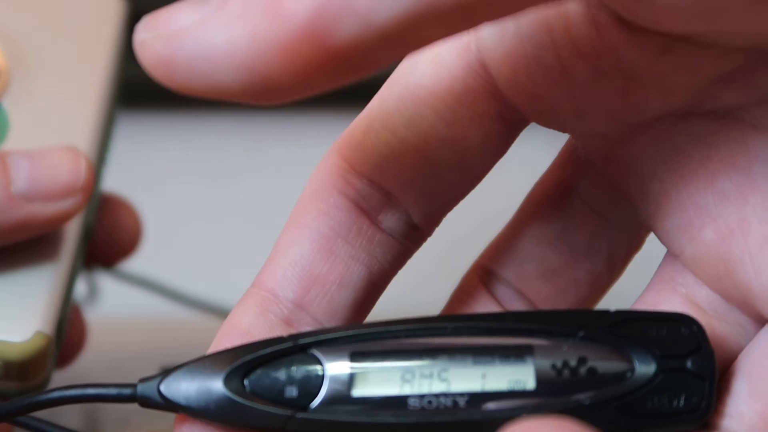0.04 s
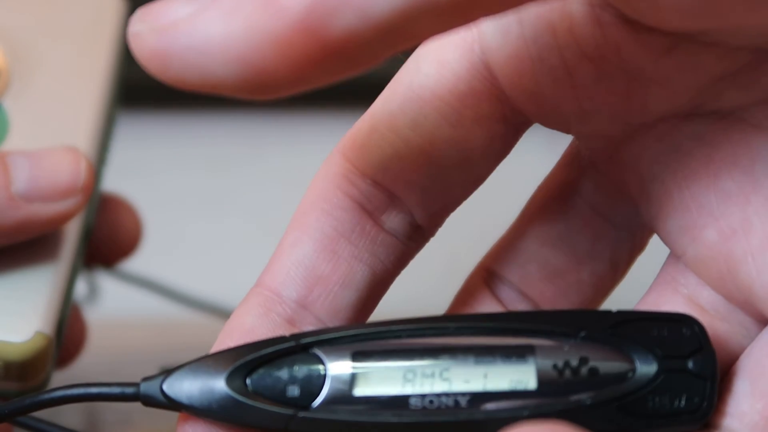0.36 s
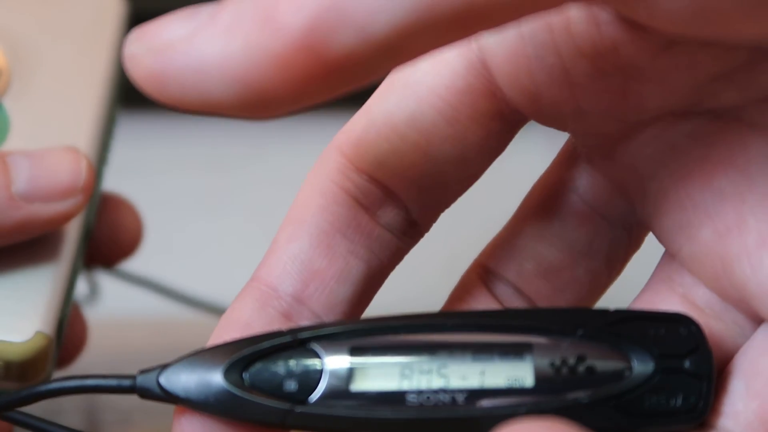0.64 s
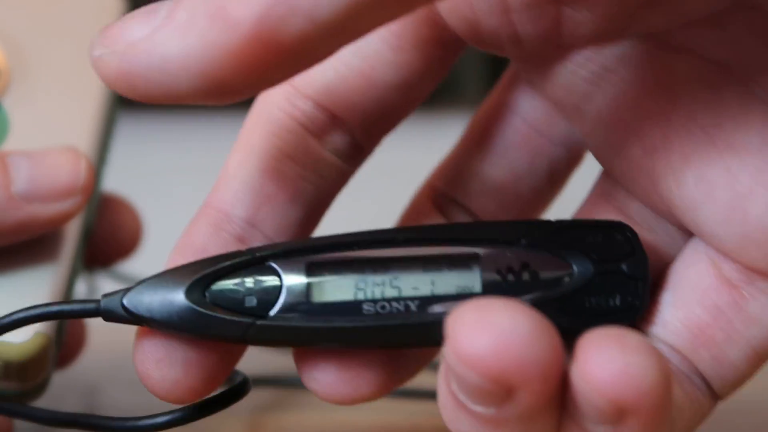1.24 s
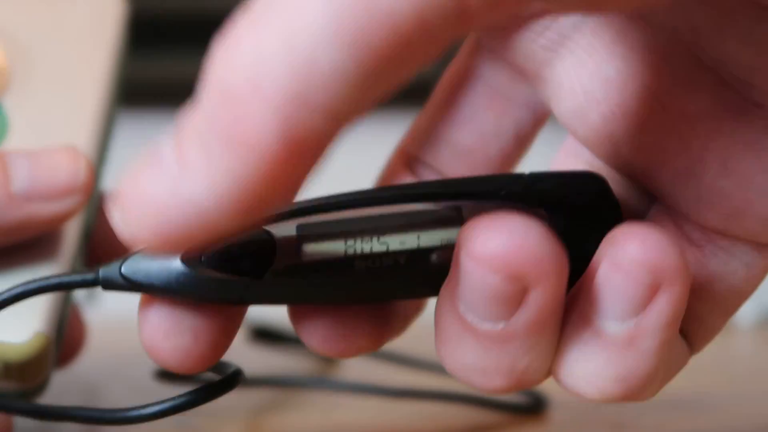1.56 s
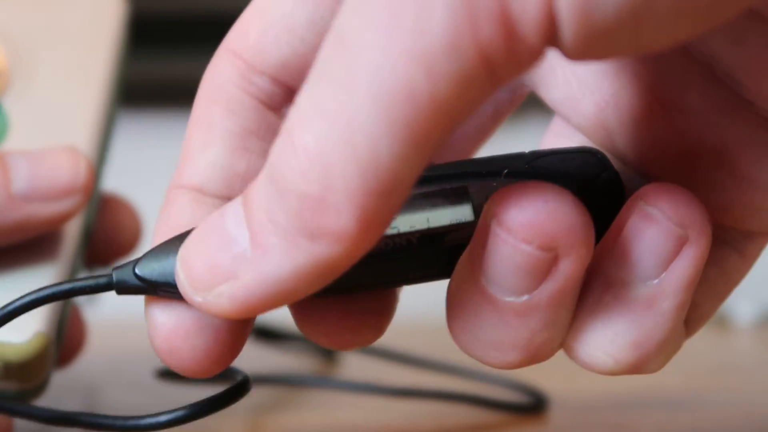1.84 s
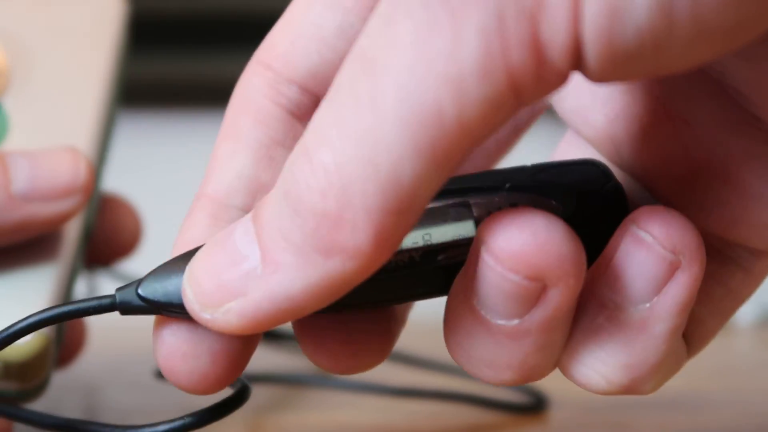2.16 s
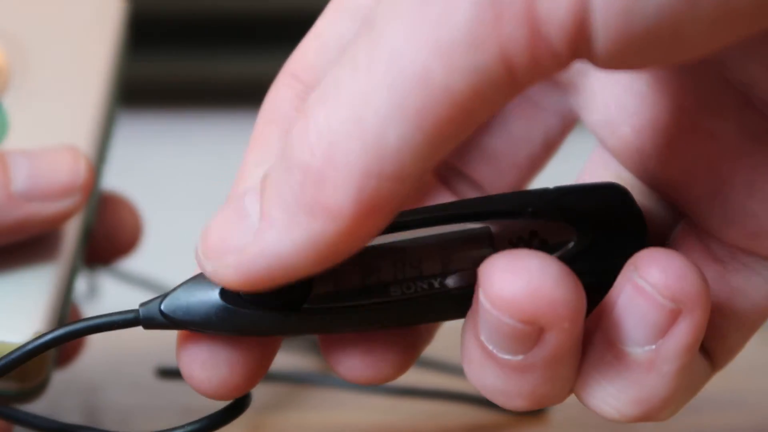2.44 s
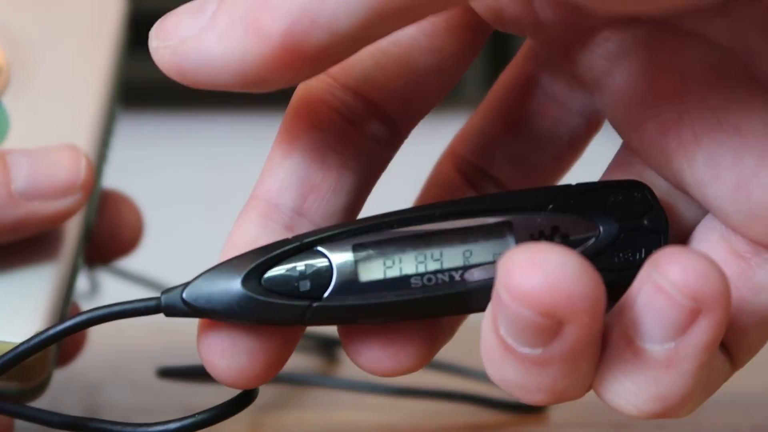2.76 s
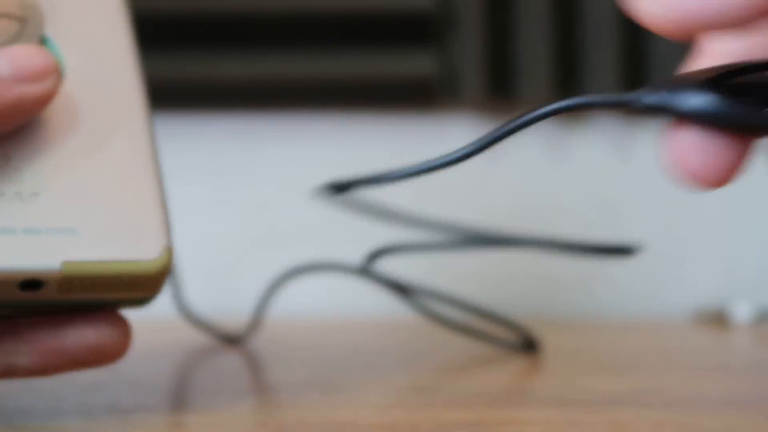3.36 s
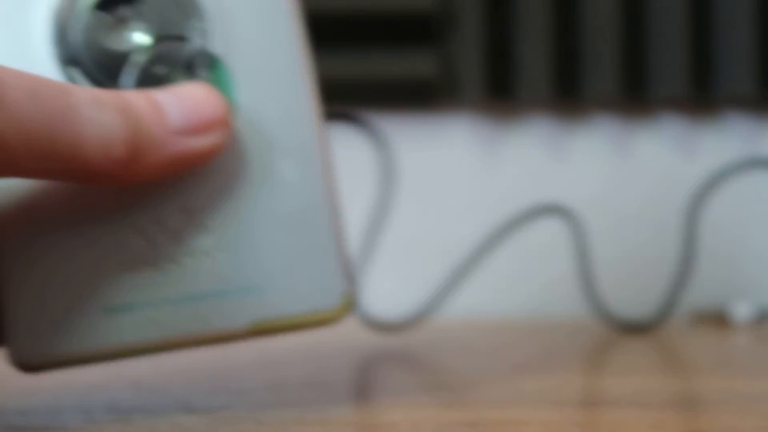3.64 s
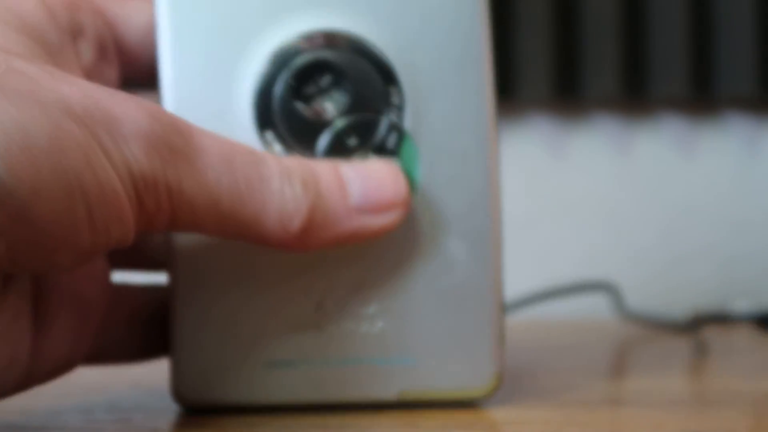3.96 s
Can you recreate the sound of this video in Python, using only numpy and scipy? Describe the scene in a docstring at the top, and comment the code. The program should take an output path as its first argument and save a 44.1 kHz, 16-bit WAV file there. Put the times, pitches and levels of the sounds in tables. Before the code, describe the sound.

A pocket cassette player winds tape close by, its gears whirring, rattling and knocking. A remote button clicks, the drive falters, runs on and stops. Soft hand thuds and a sharp key snap follow in a small, faintly humming room.

```python
"""A small room with a low hum and a faint whine; close by, a pocket cassette player winds tape.
Gear teeth rattle its case, catches tick and a wheel knocks once a turn. The remote's button clicks;
the drive falters, runs on with slower knocks and stops. A hand shifts its grip with hollow thuds
and a scrape of skin, and a key on the player snaps down and latches."""
import sys
import numpy as np
from scipy import signal
from scipy.fft import rfft, irfft
from scipy.io import wavfile

SR = 44100
rng = np.random.default_rng(int(sys.argv[2]) if len(sys.argv) > 2 else 0)


def dump_mix(stems):
    """Bounce the given channels to the path in sys.argv[1] as a 16-bit WAV at rate SR."""
    frames = np.atleast_2d(stems).T  # one column per channel
    limited = np.clip(frames, -1, 1)  # hard clip at full scale
    pcm = np.round(limited * 32767).astype(np.int16)
    wavfile.write(sys.argv[1], SR, pcm)


N = 176400
T, HZ = np.arange(N) / SR, np.maximum(np.arange(N + 1) * SR / (2 * N), 1)


def amp(db):
    """Decibels to gain."""
    return 10 ** (np.asarray(db) / 20)


def unit(x):
    """Scale to rms 1."""
    return x / np.sqrt(np.mean(x ** 2) + 1e-20)


def at_hz(points):
    """Spectrum in dB, interpolated over log frequency."""
    hz, db = np.transpose(points)
    return np.interp(np.log(HZ), np.log(hz), db)


def through(x, response):
    """Apply a frequency response."""
    return irfft(rfft(x, 2 * N) * response)[..., :N]


def lowpass(x, hz):
    """Second-order treble roll-off."""
    return signal.sosfilt(signal.butter(2, hz, fs=SR, output="sos"), x + 1e-18)


def body(x, colour, modes=()):
    """Minimum-phase filter of unit power: broad colour plus resonances."""
    db = at_hz(colour) + sum(lift / (1 + (2 * (HZ - hz) / width) ** 2) for hz, width, lift in modes)
    cepstrum = irfft(np.log(unit(amp(db))))
    cepstrum[1:N] *= 2
    cepstrum[N + 1:] = 0
    return through(x, np.exp(rfft(cepstrum)))


def drift(hz):
    """Random wander of rms 1, mostly below hz."""
    return unit(through(rng.standard_normal(N), 1 / (1 + (HZ / hz) ** 2)))


def burst(s, t60):
    """Decaying contact chatter of unit energy."""
    count = SR // 2
    chatter = rng.choice([-1, 1], count) * amp(-60 * np.arange(count) / SR / t60)
    out, start = np.zeros(N + SR), int(s * SR)
    out[start:start + count] = chatter / np.linalg.norm(chatter)
    return out[:N]


def burst_pair(s, t60):
    """Two independent bursts."""
    return np.array([burst(s, t60), burst(s, t60)])


def strike(s, t60, snap_db):
    """Mid: clean impact plus chatter. Side: chatter only."""
    impact = np.arange(N) == int(s * SR)
    mid = (amp(snap_db) * impact + burst(s, t60)) / np.hypot(1, amp(snap_db))
    return np.array([mid, burst(s, t60)])


def stereo(mid, side, width, pan_db=0):
    """Mid and side to left and right; width is the side/mid spectrum."""
    ratio = amp(at_hz(width))
    mid = through(mid, 1 / np.hypot(1, ratio))
    side = through(side, ratio / np.hypot(1, ratio))
    return np.array([(mid + side) * amp(pan_db / 2), (mid - side) * amp(-pan_db / 2)])


# room noise spectrum: f/Hz, level/dB
AIR_COLOUR = [(15, -36), (25, -10), (38, -6.5), (55, -8.5), (146, -2.5), (213, -3), (250, -9), (400, -10),
              (573, -15), (800, -17), (1500, -18.5), (3200, -25), (7000, -33), (12500, -41), (15000, -65)]
# hums: f/Hz, level/dB, width/Hz
HUMS = [(57.4, -56.5, 3.37), (212.8, -60, 17), (269.1, -62, 7.3), (472.8, -61.5, 4.04)]
# room stereo width: f/Hz, side re mid/dB
AIR_WIDTH = [(30, -49), (60, -27), (130, -20), (330, -4.5), (700, -3), (2000, 2.5), (6000, 2.5), (14000, 3)]

def room_tone(noise_db=-49, waver=0.5884):
    """Rumble and hiss with wavering hums."""
    air = amp(noise_db) * body(rng.standard_normal((2, N)), AIR_COLOUR)
    for hz, db, width in HUMS:
        pitch_hz = hz + waver * width * np.array([drift(width), drift(width)])
        air += amp(db) * np.sqrt(2) * np.sin(2 * np.pi * np.cumsum(pitch_hz, axis=1) / SR)
    return stereo(*air, AIR_WIDTH)


def whine(hz=13001, db=-84.5, left_lead_rad=1.75):
    """Thin, steady electronic tone, leading on the left."""
    phase = 2 * np.pi * hz * T + np.array([[left_lead_rad], [0]])
    return amp(db) * np.sqrt(2) * np.sin(phase)


# rattle envelope: t/s, level/dB
RATTLE = [(0.05, -77), (0.085, -52), (0.125, -45), (0.175, -48.5), (0.186, -37), (0.2, -37.5),
          (0.221, -44.5), (0.232, -37.5), (0.32, -37.5), (0.39, -37), (1.35, -36.5), (2.19, -35.5),
          (2.225, -45), (2.29, -47), (2.335, -40), (2.86, -39.5), (2.97, -40.5), (3.02, -49), (3.11, -62)]
# brief surges: t/s, lift/dB
SURGES = [(0.275, 5), (0.64, 1.5), (1.44, 2.5), (2.16, 0.5), (2.855, 1)]
# rattle spectrum: f/Hz, level/dB
GEAR_COLOUR = [(100, -41.5), (450, -19), (750, -19.5), (1280, -16), (1450, -4.5), (2000, -5.5), (2600, -12),
               (3900, -20), (6000, -22.5), (8300, -23.5), (8850, -28), (10500, -33), (12300, -38.5),
               (15000, -52)]
# case resonances: f/Hz, width/Hz, lift/dB
CASE_MODES = [(966, 90, 9), (1160, 130, 5), (1482, 160, 3.5), (1757, 173, 8.3), (1906, 187, 3),
              (2200, 47, -1), (2460, 114, 4), (2569, 71, 4), (2840, 58, 4.5), (3352, 93, 10.5),
              (3506, 110, 9), (4144, 130, 2), (4500, 145, 8), (4740, 120, 4.5), (5205, 211, 8),
              (6500, 106, 8.5), (7030, 300, 3), (9500, 310, 7)]

def gears(teeth_per_s=440, jitter=.22, spread_db=1.5, scrape_s=0.0015, rub_db=4,
          motor_hz=228.7, wander_hz=8.8, throb_db=0.9, surge_s=0.0149, flutter_db=0.47, gain_db=0.5):
    """Loose teeth strike unevenly and scrape, harder once per motor turn; the case rings."""
    teeth = 4000
    timing, strength = rng.standard_normal((teeth, 2)).T
    onsets = ((np.arange(teeth) + 2 + jitter * timing) / teeth_per_s * SR).astype(int)
    strikes = np.bincount(np.clip(onsets, 0, N), amp(spread_db * strength), N + 1)[:N]
    contact = unit(signal.lfilter([1], [1, -np.exp(-1 / (scrape_s * SR))], strikes))
    turns = np.cumsum(motor_hz + wander_hz * drift(5.64)) / SR
    throb = amp(throb_db * np.sin(2 * np.pi * turns))
    force = unit(throb * np.hypot(contact, amp(rub_db)) * rng.choice([-1, 1], (2, N)))
    ring = through(force, rfft(burst(0.001984, t60=0.1), 2 * N))
    rattle = unit(force + amp(-12.5) * ring)
    drive_db = np.interp(T, *np.transpose(RATTLE), right=-100)
    surge_db = sum(db * np.exp(-((T - s) / surge_s) ** 2) for s, db in SURGES)
    envelope = amp(drive_db + surge_db + gain_db + flutter_db * drift(35))
    return body(rattle * envelope, GEAR_COLOUR, CASE_MODES)


# wheel runs: start t/s, end t/s, period/s, level/dB
WHEEL_RUNS = [(.081, 2.17, .0531, -23), (2.441, 2.85, .0970, -24)]
# further wheel and lever knocks, some on the wheel's beat: t/s, level/dB, t60/s
EXTRA_KNOCKS = [(.058, -28, 0.0136), (.087, -19.5, 0.03), (.111, -20, 0.037), (.1185, -15, 0.03),
                (.1245, -14, 0.061), (.135, -12.5, 0.052), (.2255, -26, 0.02), (.506, -24, 0.019),
                (.612, -21.5, 0.021), (.986, -18, 0.022), (1.093, -23, .025), (1.148, -15, 0.0173),
                (1.253, -25.5, .025), (1.306, -20.5, 0.0226), (1.784, -17, 0.03), (1.89, -22, .025),
                (2.046, -22, .025), (2.1, -22.5, .025), (2.2575, -17, 0.019), (2.441, -24, .025),
                (2.539, -18.5, 0.02), (2.732, -26, .025), (2.829, -17, 0.019), (2.971, -18, 0.032),
                (3.012, -21, 0.032), (3.059, -25, 0.038), (3.188, -24.5, 0.021)]
# knock spectrum: f/Hz, level/dB
KNOCK_COLOUR = [(100, -19), (400, -8), (650, 6.5), (940, 13), (1300, -5.5), (2200, 1.5), (5000, -23),
                (15000, -65.5)]

def knocks(spread_db=1, t60_s=0.053):
    """One dull knock per wheel turn, plus further knocks of wheel and levers, some landing on the wheel's beat."""
    hits = list(EXTRA_KNOCKS)
    for start, end, period, db in WHEEL_RUNS:
        levels_db = db + spread_db * rng.standard_normal(60)
        hits += [(s, level, t60_s) for s, level in zip(np.arange(start, end, period), levels_db)]
    force = sum(amp(db) * strike(s, t60, snap_db=2) for s, db, t60 in hits)
    return body(force, KNOCK_COLOUR)


# catch clicks: t/s, level/dB, t60/s, tilt/(dB/octave)
CATCHES = [(0.0897, -20, 0.014, -4), (0.116, -18.5, 0.0121, 7.5), (0.1285, -31, 0.02, 0),
           (0.144, -24, 0.027, -10), (0.1798, -19.5, 0.06, -5), (.183, -16, 0.018, -9),
           (0.2254, -14, 0.0071, -9.5), (3.1882, -36, .012, 3)]
# click spectrum before tilt: f/Hz, level/dB
CATCH_COLOUR = [(200, -36), (1500, 1.5), (3000, 1), (5000, 7), (7000, -4), (9000, -1.5), (12000, -19.5),
                (15000, -22)]

def catches():
    """Small catches click, some brighter than others."""
    clicks = 0
    for s, db, t60, tilt in CATCHES:
        colour = [(hz, level + tilt * np.log2(hz)) for hz, level in CATCH_COLOUR]
        clicks += amp(db) * body(burst_pair(s, t60), colour)
    return clicks


# button down, seated, up: t/s, level/dB, t60/s, cutoff f/Hz
BUTTON_HITS = [(1.943, -9.5, .008, 14000), (1.9446, -11.5, .012, 5500), (2.3486, -12.5, 0.014, 6500)]
# button spectrum: f/Hz, level/dB
BUTTON_COLOUR = [(200, -28), (1500, 8.5), (3000, -2.5), (5000, -5), (6500, -1), (8000, -12), (11000, -5),
                 (13000, -14), (15000, -28)]
# shell resonances: f/Hz, width/Hz, lift/dB
BUTTON_MODES = [(3686, 260, 11), (4150, 280, 14.5)]

def button():
    """The remote's button snaps in and springs back; its small shell rings."""
    force = sum(amp(db) * lowpass(strike(s, t60, snap_db=2), hz) for s, db, t60, hz in BUTTON_HITS)
    return body(force, BUTTON_COLOUR, BUTTON_MODES)


# finger presses: t/s, level/dB, t60/s
GRIPS = [(3.543, -15.5, 0.073), (3.584, -20, .1), (3.6332, -10.5, 0.11), (3.655, -9.5, 0.14),
         (3.673, -10, 0.061), (3.813, -15, 0.23), (3.854, -16, 0.14), (3.932, -12, 0.44),
         (3.979, -18, 0.091)]
# thud spectrum: f/Hz, level/dB
GRIP_COLOUR = [(30, -1.5), (70, 6), (230, -0.5), (520, -6.5), (760, 1), (950, -20), (2000, -41.5),
               (5000, -44), (15000, -63.5)]
# skin slide envelope: t/s, level/dB
SLIDE = [(3.1, -63), (3.45, -62.5), (3.56, -57), (3.63, -63), (3.7, -58.5), (3.76, -58.5), (3.86, -61),
         (4, -63.5)]
# slide spectrum: f/Hz, level/dB
SLIDE_COLOUR = [(300, -24), (1500, -1.5), (2300, -4), (2900, -0.5), (5000, -9), (12000, -18), (15000, -30)]
# held case resonances: f/Hz, width/Hz, lift/dB
HELD_MODES = [(223, 33.7, 9), (310.6, 50, 10.5), (452, 35, 9), (650, 80, 3.5), (1710, 85, 8.5),
              (2664, 145, 5.5), (3450, 130, 6), (4124, 130, 3.5)]

def hand(rough_db=2, slip_hz=40):
    """Skin scrapes the case unevenly; fingers land with hollow thuds."""
    thuds = sum(amp(db) * strike(s, t60, snap_db=-3) for s, db, t60 in GRIPS)
    slide_db = np.interp(T, *np.transpose(SLIDE), left=-100)
    scrape = rng.standard_normal((2, N)) * amp(slide_db + rough_db * drift(slip_hz))
    return body(thuds, GRIP_COLOUR, HELD_MODES) + body(scrape, SLIDE_COLOUR, HELD_MODES)


# key contacts: t/s, level/dB, t60/s, cutoff f/Hz
KEY_HITS = [(3.7692, -1, 0.02, 7550), (3.7711, 5, 0.017, 2200), (3.7746, 4, 0.011, 8100),
            (3.7761, 0.5, 0.012, 6030)]
# key spectrum: f/Hz, level/dB
KEY_COLOUR = [(100, -44), (500, -27), (720, -18), (980, -7.5), (1300, -20.5), (1600, -4.5), (2500, -17),
              (3800, -14), (5500, -4.5), (6800, -15), (10000, -10.5), (14000, -15), (15200, -46.5)]
# key resonances: f/Hz, width/Hz, lift/dB
KEY_MODES = [(940, 85, 7), (1120, 160, 11), (1710, 220, 8), (2200, 230, 10.5), (2470, 192, 11),
             (3146, 213, 15), (3450, 247, 12.5), (4554, 190, 5.5), (5500, 410, -1.5), (8300, 220, 8.5)]

def key(ring_db=-5.5, ring_t60_s=0.062):
    """The key latches in four quick contacts; each rings the mechanism."""
    force = 0
    for s, db, t60, hz in KEY_HITS:
        ring = amp(ring_db) * burst_pair(s, ring_t60_s)
        force += amp(db) * lowpass(strike(s, t60, snap_db=-3) + ring, hz)
    return body(force, KEY_COLOUR, KEY_MODES)


def radiate(source, width, pan_db, shared=0.52, smear_s=0.018, left_lead_s=16e-6):
    """The case radiates differently to each side, partly the same vibration in another phase."""
    mid, side = source
    smear_rad = np.angle(rfft(burst(0, smear_s), 2 * N))
    smeared = through(mid, np.exp(1j * smear_rad))
    side = np.sqrt(1 - shared) * side + np.sqrt(shared) * smeared
    left, right = stereo(mid, side, width, pan_db)
    return np.array([left, through(right, np.exp(-2j * np.pi * HZ * left_lead_s))])


def reverb(x, delay_s=.006, t60_s=0.24, wet_db=-20):
    """Short diffuse room tail, different in each channel."""
    return amp(wet_db) * through(x, rfft(burst_pair(delay_s, t60_s), 2 * N))


# key and hand stereo width: f/Hz, side re mid/dB
HANDLING_WIDTH = [(100, -34.5), (400, -16.5), (900, -26), (1800, -34), (3000, -20), (4600, -22),
                  (6000, -11.5), (8000, 2), (12000, 1)]
# drive and button stereo width: f/Hz, side re mid/dB
MECHANISM_WIDTH = [(100, -19), (600, -21), (1500, -30.5), (2000, -10), (2600, -58), (3200, -5),
                   (3800, -6.5), (6000, -6.5), (8000, -1), (12000, 11)]

def scene():
    """Player, remote and hand in the room."""
    air = room_tone() + whine()
    handling = radiate(key() + hand(), HANDLING_WIDTH, pan_db=-0.2)
    mechanism = radiate(gears() + catches() + knocks() + button(), MECHANISM_WIDTH, pan_db=1.5)
    direct = handling + mechanism
    return direct + reverb(direct) + air


def record(dry):
    """Steep low-pass at 14.9 kHz."""
    return signal.sosfilt(signal.ellip(10, .2, 80, 14900, fs=SR, output="sos"), dry)


dry = scene()
out = record(dry)
dump_mix(out)
```